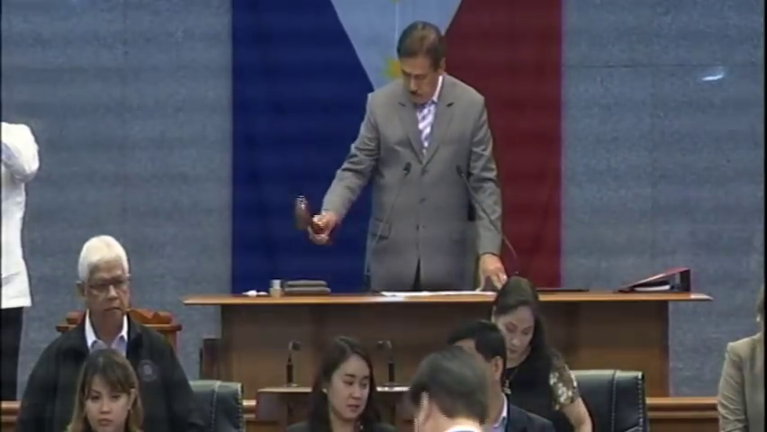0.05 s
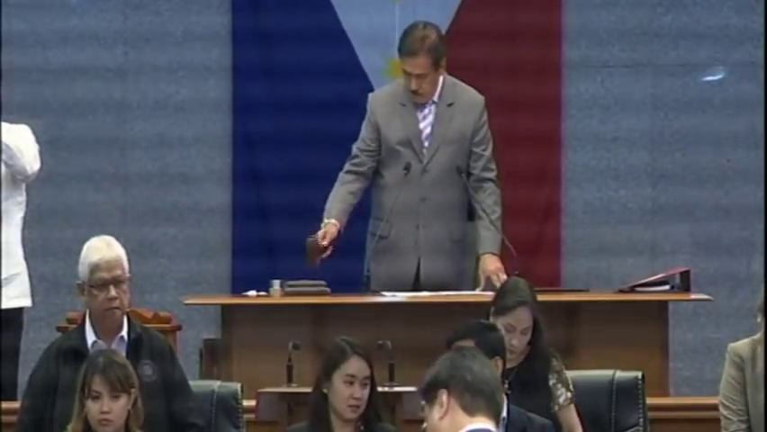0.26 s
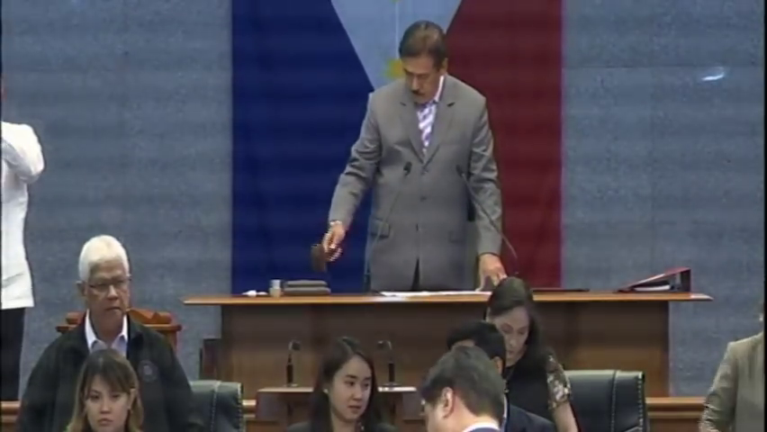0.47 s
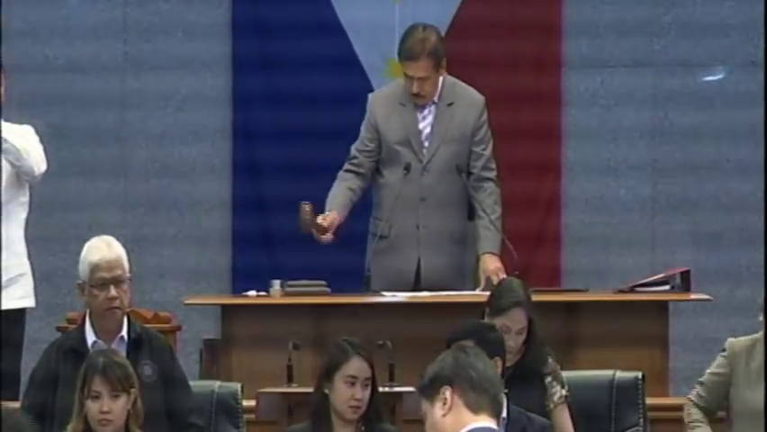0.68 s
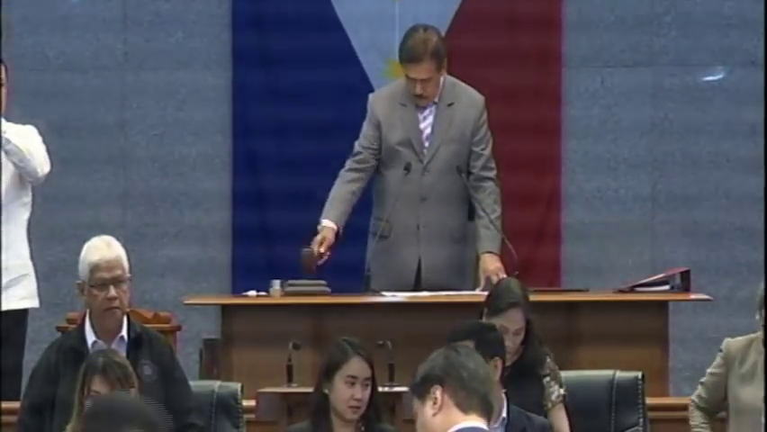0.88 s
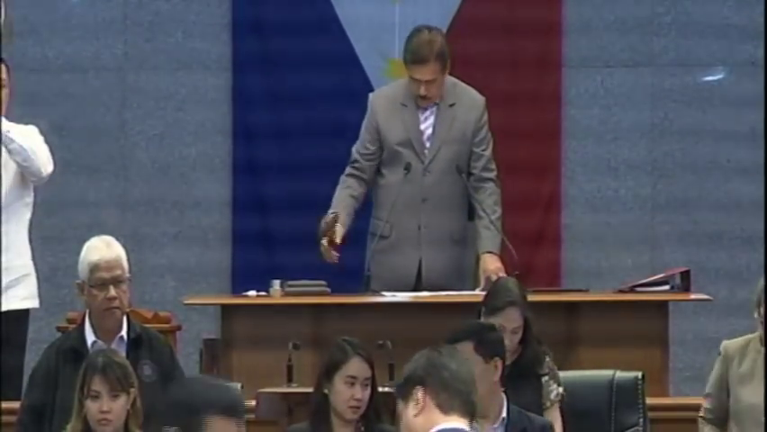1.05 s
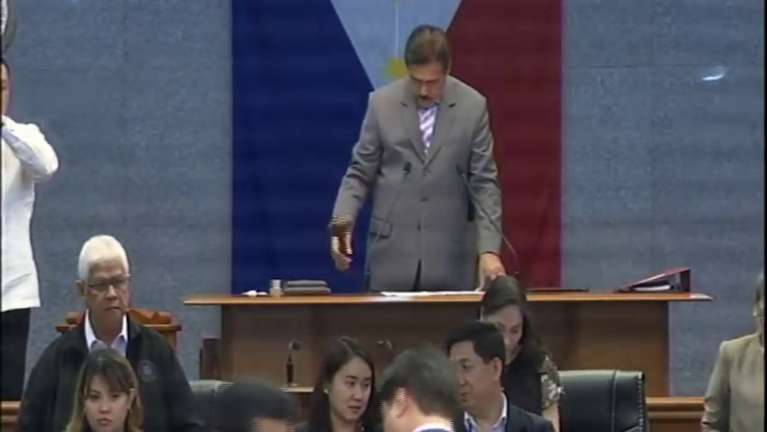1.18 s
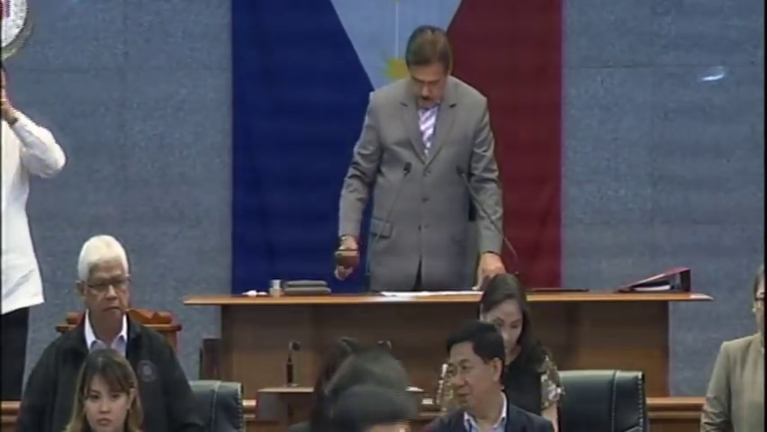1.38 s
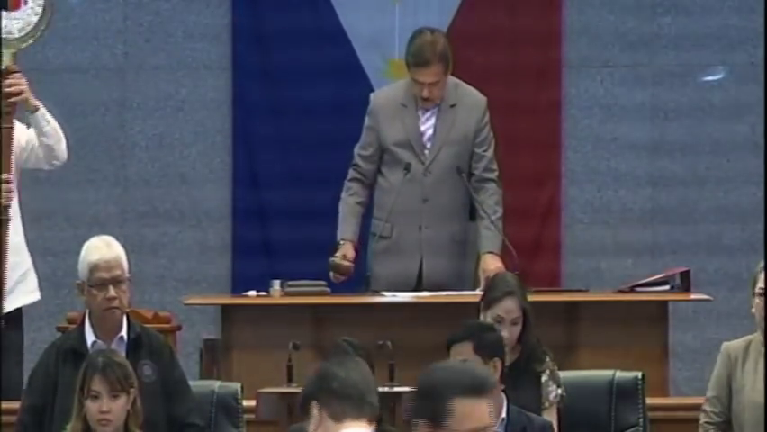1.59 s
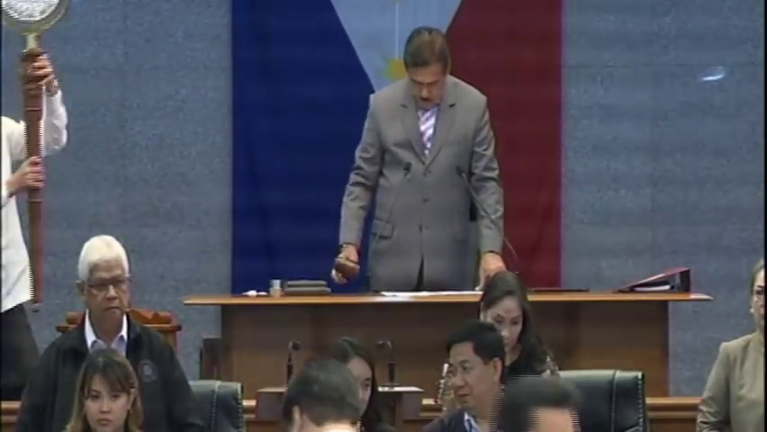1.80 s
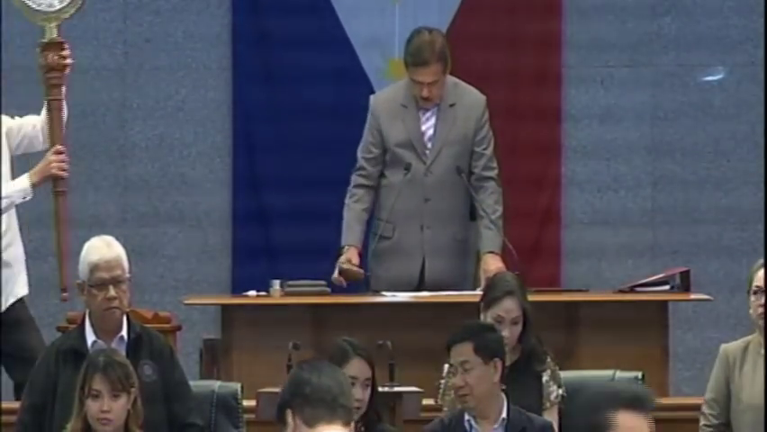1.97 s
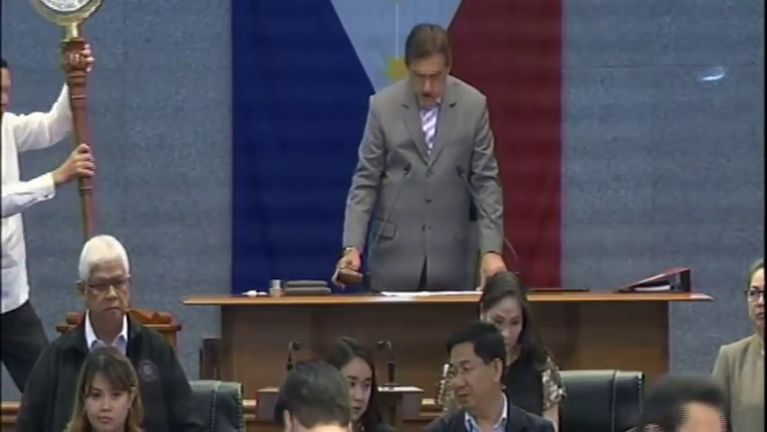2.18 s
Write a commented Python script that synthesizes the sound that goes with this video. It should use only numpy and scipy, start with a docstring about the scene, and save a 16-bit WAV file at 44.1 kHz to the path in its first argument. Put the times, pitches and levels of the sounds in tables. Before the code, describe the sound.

A wooden gavel knocks twice on its block in a large chamber, each blow echoing briefly

```python
"""A wooden gavel knocks on its block on a rostrum, at an even pace, in a large chamber.
Each blow sums a noise crack, decaying sine modes of block and hollow desk, and noise bands for wood and echo.
Under it: ventilation as shaped noise, mains hum and a whine as sines, faint electrical pips,
a thin click and a faint low-treble knock as short noise bursts, a rustle.
A desk microphone close by overloads softly on the peaks."""
import sys
import numpy as np
from scipy import signal
from scipy.fft import rfft, irfft, next_fast_len
from scipy.io import wavfile

SR = 44100
rng = np.random.default_rng(int(sys.argv[2]) if len(sys.argv) > 2 else 0)


def log_audio(samples):
    """Write samples as a 16-bit WAV file to the path given in sys.argv[1]."""
    # one column per channel
    frames = np.atleast_2d(samples).T
    # limit to full scale, then quantise
    limited = np.clip(frames, -1, 1)
    pcm = np.round(limited * 32767).astype(np.int16)
    wavfile.write(sys.argv[1], SR, pcm)


N = 98739
T_S = np.arange(N) / SR

# Gavel blows; the first falls before the start, so only its ring is left.
# hardness raises ring, room tones and crack against the modes: start_s, strength_db, hardness_db
BLOWS = [(-.58, 0, -1.5), (0.1609, -1.5, 0.5), (0.9041, -1, 2)]
# Modes of block and desk, before blow strength and low cut: pitch_hz, level_db, t60_s, rise_s
MODES = [(134.86, -27.5, 0.53, 0.022), (179.9, -41.5, 1.88, .004), (204.3, -35.5, 0.61, .004),
         (230.3, -23.5, 0.27, .006), (280.8, -39, 0.87, .004), (311.3, -30.5, .3, .003),
         (364, -25.5, 0.34, 0.0021), (453, -39, 0.85, .004), (509.9, -11.5, .19, 0.0027),
         (539, -34, 0.73, 0.0075), (562.8, -14, .19, .003), (622.7, -23.5, 0.26, 0.00067),
         (671.8, -20.5, 0.22, 0.0017), (857, -32.5, .25, .002)]
# Narrow chamber resonances, levels as the peak of an equal-power sine, before blow gains:
# pitch_hz, half_width_hz, level_db, t60_s
ROOM_TONES = [(498, 14, -31.5, 0.56), (955, 49, -36.5, .28), (1124, 18, -41, .33), (1242, 10, -38.5, 0.32),
              (1410, 36, -47, 0.36), (2018, 23, -45, .65), (2354, 60, -45, 0.65), (3897, 200, -45, 0.41)]
# Dense wood ring and chamber echo per half-octave band, levels as for ROOM_TONES:
# band_hz, wood_level_db, echo_level_db, echo_t60_s
RING = [(60, -44.5, -61, 1), (130, -41.5, -51.5, 1), (260, -24, -41.5, 0.64), (481.5, -26.5, -32.5, 0.62),
        (950, -28, -40.5, 0.49), (2100, -23.5, -42, 0.63), (3600, -38.5, -49.5, .46),
        (6120, -39.5, -55.5, 0.35), (8240, -46, -63, 0.28), (10160, -53.5, -79.5, 0.2),
        (15000, -60.5, -84.5, .25)]
# Mains hum and a thin whine: pitch_hz, rms_level_db
HUM = [(60, -74.5), (120, -77.5), (180, -85), (963, -87.5)]
# Ventilation spectrum, relative: band_hz, density_db
AIR = [(25, -31.5), (48, -4.5), (71, -3.5), (88, -13), (177, -8.5), (280, -3), (400, -11.5), (600, -11),
       (1110, -21), (3000, -26.5), (6000, -30.5), (15500, -29.5)]
# Electrical pips, fundamental then octave: level_db
BUZZ_DB = [-66.5, -66]
# A thin click, then a faint low-treble knock: start_s, centre_hz, width_octaves, decay_s, level_db
CLICK_AND_KNOCK = [(.32, 8000, 2.3, 0.00078, -50), (1.616, 2080, 0.5, .022, -70.5)]
# Stereo spread: band_hz, side_re_mid_db
SIDE = [(100, -47.5), (500, -35.5), (1400, -23), (2800, -13.5), (5500, -8), (15000, -11)]

WOOD_T60_S, WOOD_BUILD_CYCLES = 0.16, 0.95  # low notes of the wood take longer to speak
ECHO_BUILD_S = 0.015
GRAIN_DB, GRAIN_HZ = 4, 45.27  # spread and spacing of the wood's irregular peaks
BLOW_VARIETY = 0.35  # fresh ring per blow, as a ratio to the shared ring
# The head lands flat just after its edge.
CRACK_LAG_S, CRACK_DECAY_S, CRACK_HZ, CRACK_OCTAVES, CRACK_DB = 0.0026, 0.002, 2100, 0.54, -15.5
GAVEL_LOW_CUT_HZ = 70
AIR_RMS_DB = -67.5
BUZZ_RATE_HZ, BUZZ_HZ, BUZZ_PIP_S = 59.94, 5932, 0.0022
BUZZ_SHARE, BUZZ_GROUP_S = 0.6, 0.045  # chance that a run sounds, run length
RUSTLE_S, RUSTLE_LENGTH_S, RUSTLE_HZ, RUSTLE_DB = 1.84, 0.1, 3080, -81.5  # someone shifts, far off
OVERLOAD_DB, OVERLOAD_KNEE = -17.5, 4.3  # higher knee, harder bend
LOW_CUT_HZ, TREBLE_HZ, TOP_HZ = 14, 9200, 15800


def undb(db):
    """Decibels to gain."""
    return 10 ** (np.asarray(db) / 20)


def fade(t60_s):
    """Exponential decay, 60 dB down after t60_s."""
    return np.exp(-np.log(1000) * T_S / t60_s)


def build(rise_s):
    """Exponential approach from silence to 1, time constant rise_s."""
    return 1 - np.exp(-T_S / max(rise_s, 1e-5))


def at(hz, table, axis=1):
    """Interpolate a table column on a log-frequency axis."""
    table = np.array(table, float)
    return np.interp(np.log(np.maximum(hz, 1)), np.log(table[:, 0]), table[:, axis])


def shape(x, gain):
    """Filter by a gain that is a function of frequency in Hz."""
    size = next_fast_len(N)
    f_hz = np.maximum(np.fft.rfftfreq(size, 1 / SR), 1)
    return irfft(rfft(x, size) * gain(f_hz), size)[:N]


def noise(gain):
    """Coloured noise of unit rms."""
    x = shape(rng.standard_normal(N), gain)
    return x / x.std()


def add(out, x, start_s):
    """Mix x in at start_s; whatever falls outside is dropped."""
    i = int(round(start_s * SR))
    x, i = x[max(-i, 0):], max(i, 0)
    out[i:i + len(x)] += x[:N - i]


def snap(start_s, hz, octaves, decay_s, db):
    """Short noise burst: a band of noise with instant onset and exponential decay."""
    out = np.zeros(N)
    burst = noise(lambda f: 1 / (1 + (np.log2(f / hz) / octaves) ** 2) ** 2)
    add(out, undb(db) * burst * np.exp(-T_S / decay_s), start_s)
    return out


def block_and_desk():
    """Decaying modes: the block's pitched knock and the desk's slower boom under it."""
    out = np.zeros(N)
    for k, (hz, db, t60_s, rise_s) in enumerate(MODES):
        sign = (-1) ** k
        mode = np.sin(2 * np.pi * hz * T_S) * fade(t60_s) * build(rise_s)
        out += sign * undb(db) * mode
    return out


def dense_ring(grain):
    """Countless short wood modes hand over to the chamber's echo, in half-octave bands."""
    out = np.zeros(N)
    wood_fade, echo_swell = fade(WOOD_T60_S), build(ECHO_BUILD_S)
    f_hz = np.fft.rfftfreq(next_fast_len(N), 1 / SR)
    peaks = undb(GRAIN_DB * np.interp(f_hz / GRAIN_HZ, np.arange(len(grain)), grain))
    for hz in 45 * 2 ** (np.arange(18) / 2):
        # cosine skirts cross over at constant power
        band = noise(lambda f: peaks * np.cos(np.pi / 2 * np.clip(2 * np.log2(f / hz), -1, 1)))
        wood = undb(at(hz, RING, axis=1)) * wood_fade * build(WOOD_BUILD_CYCLES / hz)
        echo = undb(at(hz, RING, axis=2)) * fade(at(hz, RING, axis=3)) * echo_swell
        out += band * (wood + echo)
    return out / np.sqrt(2)  # sine peak to rms


def room_tones():
    """Narrow noise bands that beat like clusters of close room resonances."""
    out = np.zeros(N)
    for hz, half_width_hz, db, t60_s in ROOM_TONES:
        tone = noise(lambda f: 1 / (1 + ((f - hz) / half_width_hz) ** 4))
        out += undb(db) * fade(t60_s) * tone
    return build(ECHO_BUILD_S) * out / np.sqrt(2)  # sine peak to rms


def gavel():
    """Every blow lands on the same spot: shared modes, tones, crack and grain, partly fresh ring."""
    grain = rng.standard_normal(size=1000)
    out = np.zeros(N)
    knock, shared_ring, tones = block_and_desk(), dense_ring(grain), room_tones()
    crack = snap(CRACK_LAG_S, CRACK_HZ, CRACK_OCTAVES, CRACK_DECAY_S, CRACK_DB)
    for start_s, strength_db, hardness_db in BLOWS:
        ring = shared_ring + BLOW_VARIETY * dense_ring(grain)
        ring /= np.hypot(1, BLOW_VARIETY)  # keep the power
        blow = knock + undb(hardness_db) * (ring + tones + crack)
        add(out, undb(strength_db) * blow, start_s)
    low_cut = signal.butter(2, GAVEL_LOW_CUT_HZ, "high", fs=SR, output="sos")
    return signal.sosfilt(low_cut, out)


def chamber_air():
    """Ventilation as steady shaped noise, mains hum and whine as steady sines."""
    out = undb(AIR_RMS_DB) * noise(lambda f: undb(at(f, AIR)) * (f > 25))
    for hz, rms_db in HUM:
        out += undb(rms_db) * np.sqrt(2) * np.sin(2 * np.pi * (hz * T_S + rng.random()))
    return out


def buzz():
    """Electrical interference: Gaussian tone pips at a fixed rate, present in random short runs."""
    out, t_s = np.zeros(N), np.arange(1024) / SR
    window = np.exp(-((t_s - t_s.mean()) / BUZZ_PIP_S) ** 2)
    starts_s = np.arange(0, N / SR, 1 / BUZZ_RATE_HZ)
    run_chance, phases_cycles = rng.random((2, len(starts_s)))
    for start_s, phase_cycles in zip(starts_s, phases_cycles):
        run = int(start_s / BUZZ_GROUP_S) % len(starts_s)
        if run_chance[run] < BUZZ_SHARE:
            cycles = BUZZ_HZ * t_s + phase_cycles
            pip = sum(undb(db) * np.sin(2 * np.pi * (k + 1) * cycles) for k, db in enumerate(BUZZ_DB))
            add(out, window * pip, start_s)
    return out


def click_and_knock():
    """Faint short noise bursts: a click and a knock."""
    return sum(snap(*burst) for burst in CLICK_AND_KNOCK)


def rustle():
    """Cloth or paper: band noise under a soft Gaussian swell."""
    swell = np.exp(-((T_S - RUSTLE_S) / RUSTLE_LENGTH_S) ** 2)
    return undb(RUSTLE_DB) * swell * noise(lambda f: np.exp(-np.log2(f / RUSTLE_HZ) ** 2))


def scene():
    """Gavel and background meet at one microphone that feeds both channels."""
    mono = gavel() + chamber_air() + buzz() + click_and_knock() + rustle()
    return np.array([mono, mono])


def overload(x):
    """Soft saturation towards a ceiling, at double rate to limit aliasing."""
    ceiling = undb(OVERLOAD_DB)
    x = signal.resample_poly(x, 2, 1, axis=1) / ceiling
    x = ceiling * x / (1 + np.abs(x) ** OVERLOAD_KNEE) ** (1 / OVERLOAD_KNEE)
    return signal.resample_poly(x, 1, 2, axis=1)


def spread(x):
    """Opposite phase shifts per channel; side/mid ratio is the tangent of the shift."""
    def turn(way):
        return lambda f: np.exp(1j * way * np.arctan(undb(at(f, SIDE))))
    return np.array([shape(channel, turn(way)) for channel, way in zip(x, (-1, 1))])


def record(dry):
    """Input overload, stereo phase spread, low cut, gentle treble roll-off, steep top cut."""
    x = spread(overload(dry))
    x = signal.sosfilt(signal.butter(1, LOW_CUT_HZ, "high", fs=SR, output="sos"), x)
    x = signal.sosfilt(signal.butter(1, TREBLE_HZ, fs=SR, output="sos"), x)
    return signal.sosfilt(signal.ellip(8, 0.2, 70, TOP_HZ, fs=SR, output="sos"), x)


dry = scene()
out = record(dry)
log_audio(out)
```